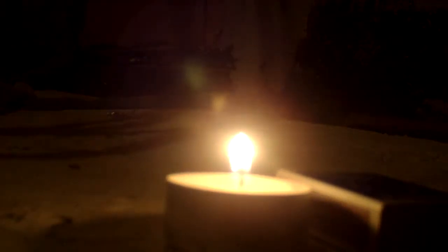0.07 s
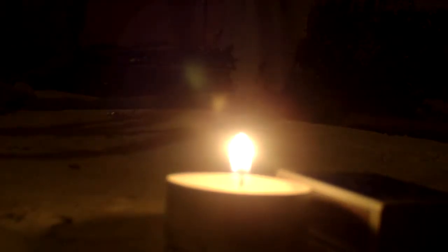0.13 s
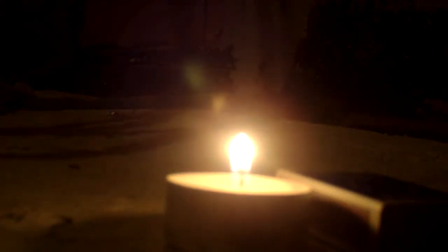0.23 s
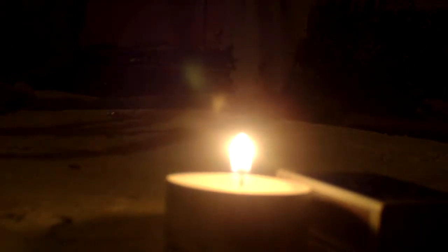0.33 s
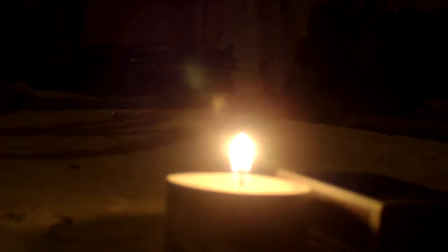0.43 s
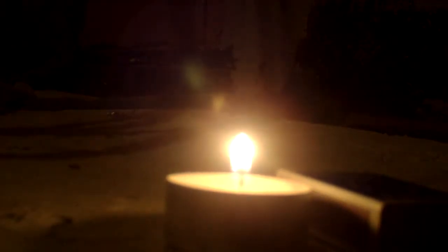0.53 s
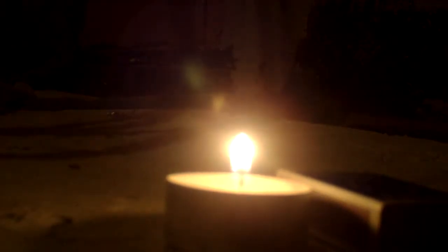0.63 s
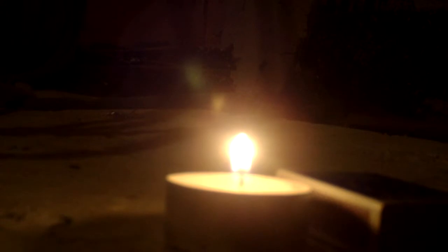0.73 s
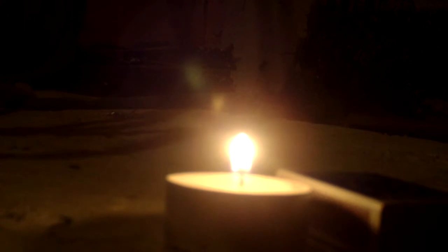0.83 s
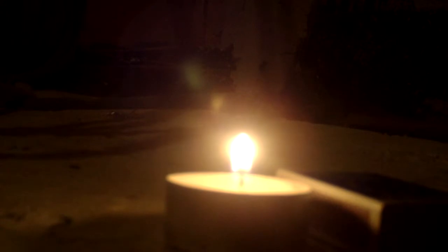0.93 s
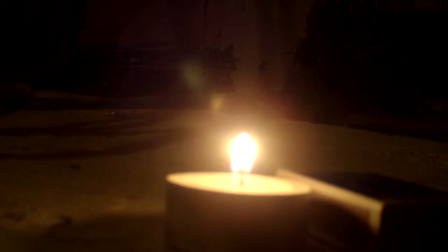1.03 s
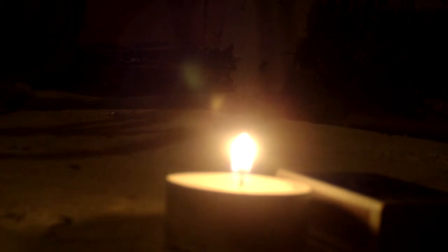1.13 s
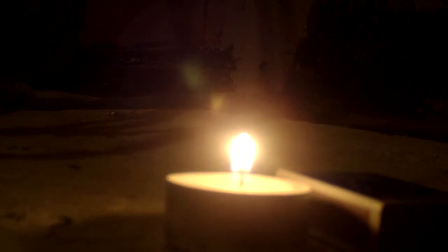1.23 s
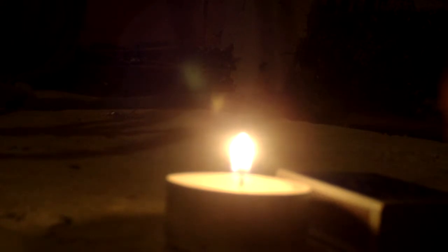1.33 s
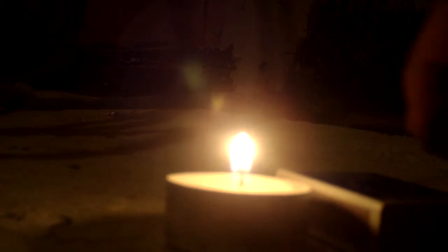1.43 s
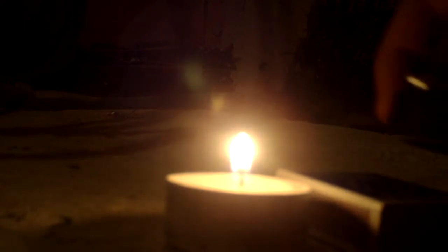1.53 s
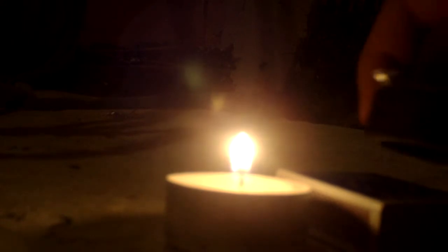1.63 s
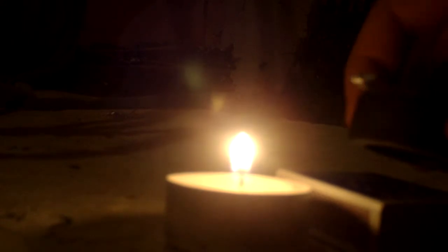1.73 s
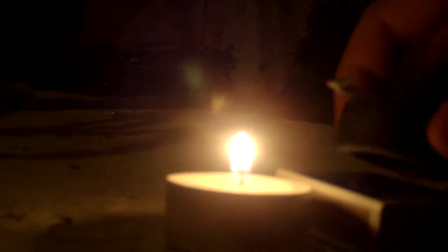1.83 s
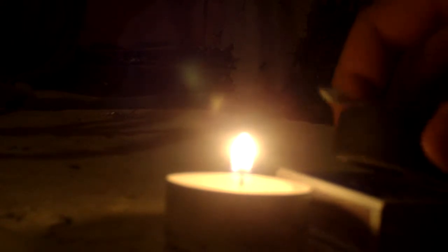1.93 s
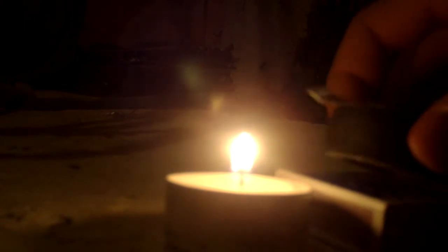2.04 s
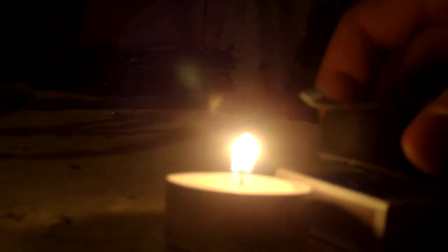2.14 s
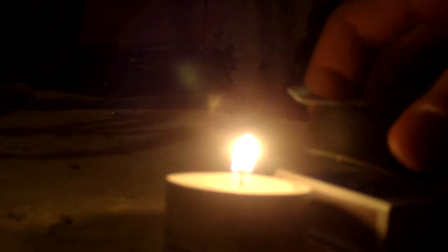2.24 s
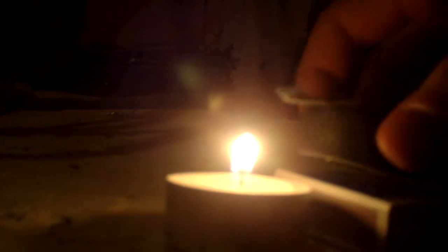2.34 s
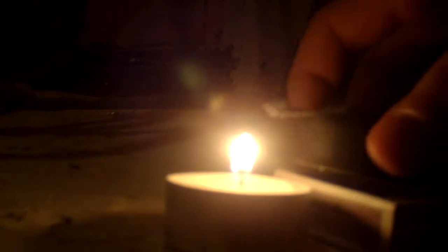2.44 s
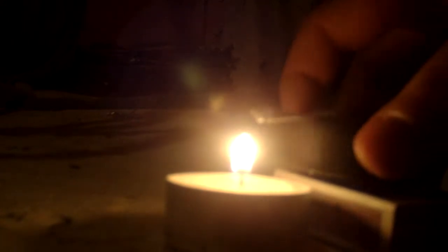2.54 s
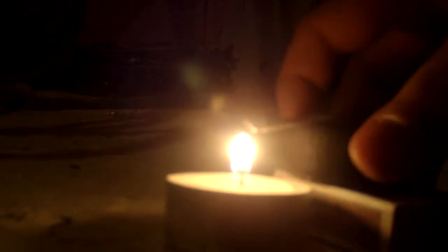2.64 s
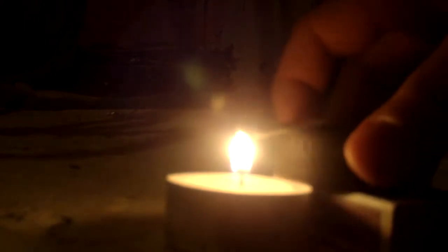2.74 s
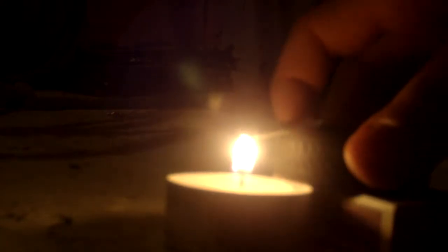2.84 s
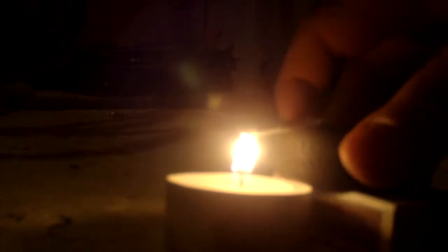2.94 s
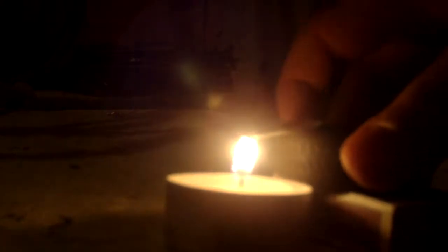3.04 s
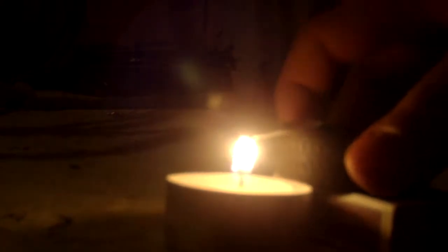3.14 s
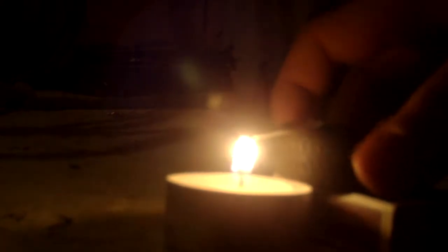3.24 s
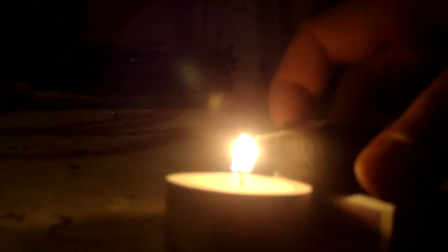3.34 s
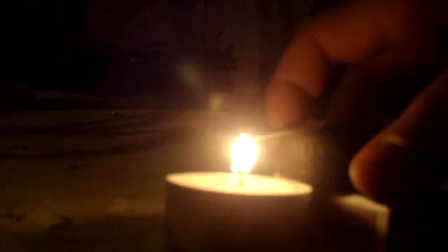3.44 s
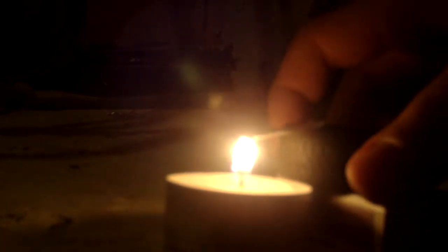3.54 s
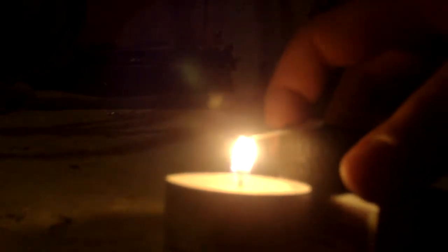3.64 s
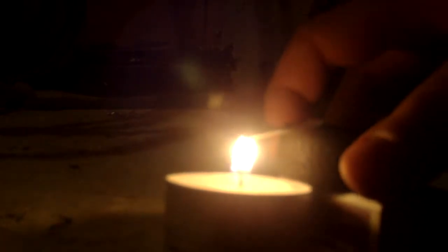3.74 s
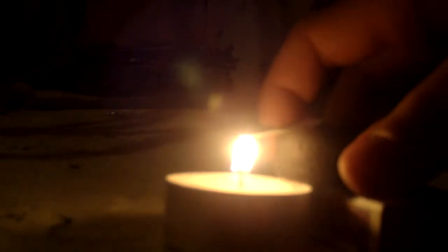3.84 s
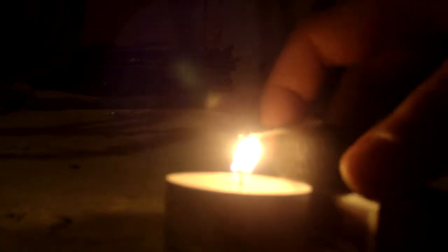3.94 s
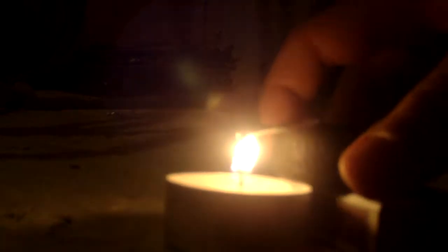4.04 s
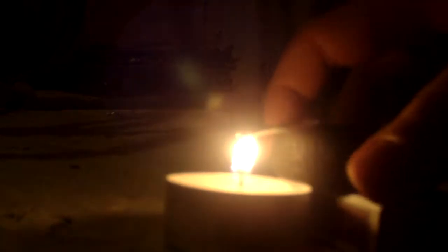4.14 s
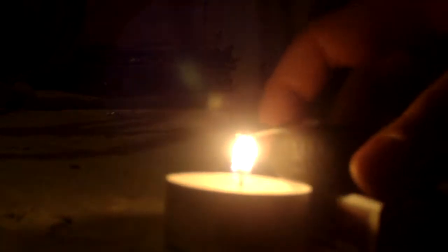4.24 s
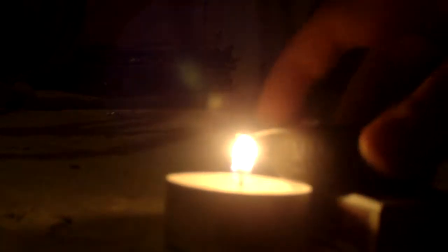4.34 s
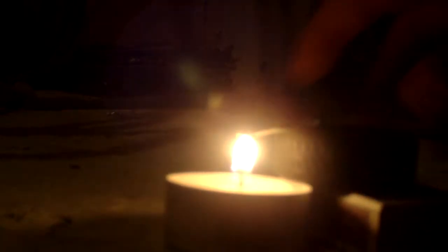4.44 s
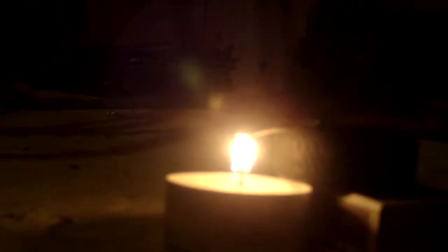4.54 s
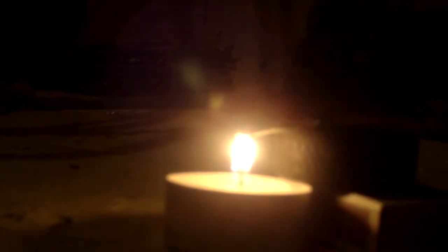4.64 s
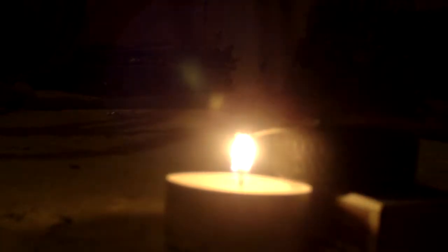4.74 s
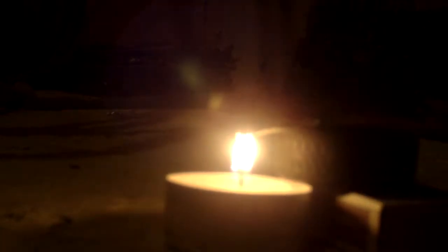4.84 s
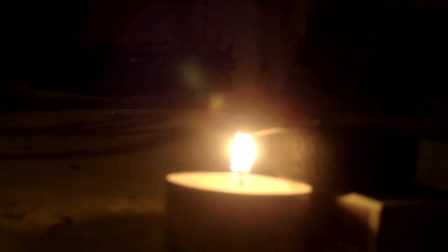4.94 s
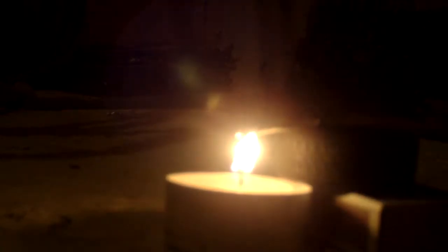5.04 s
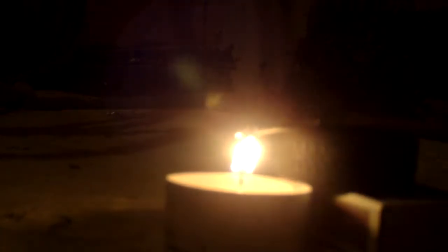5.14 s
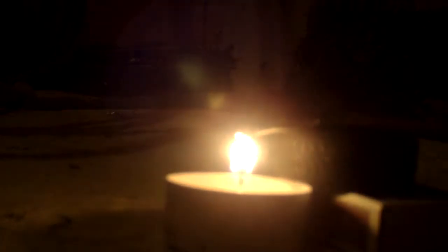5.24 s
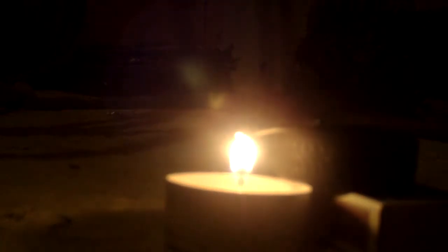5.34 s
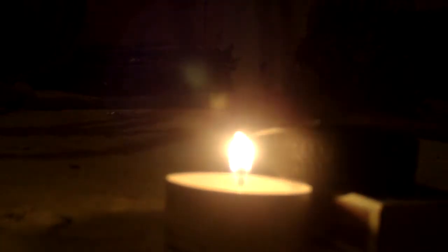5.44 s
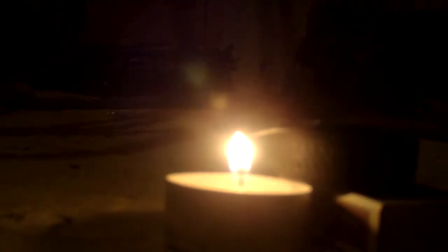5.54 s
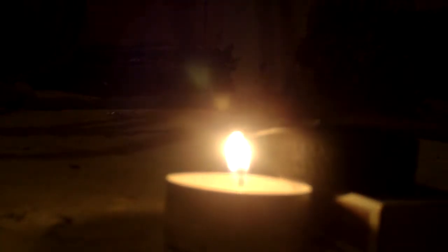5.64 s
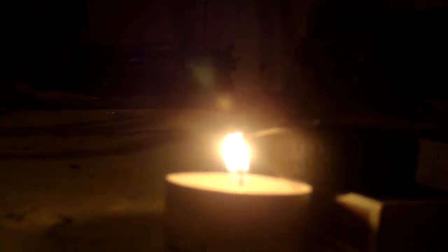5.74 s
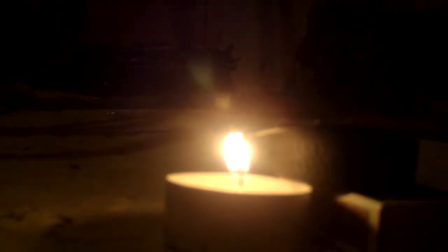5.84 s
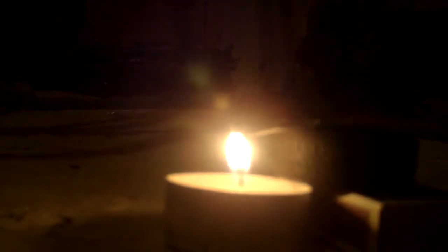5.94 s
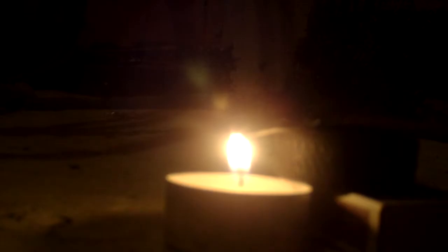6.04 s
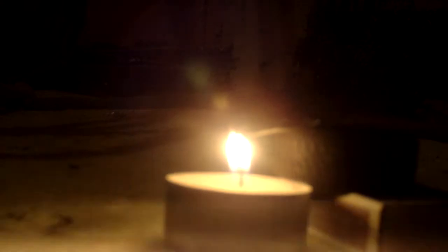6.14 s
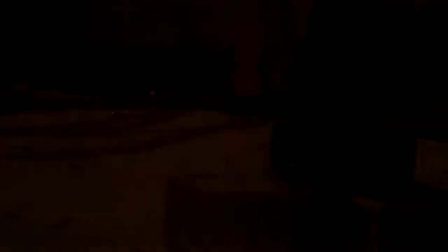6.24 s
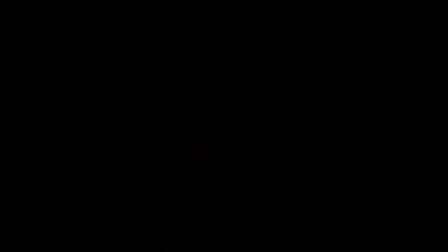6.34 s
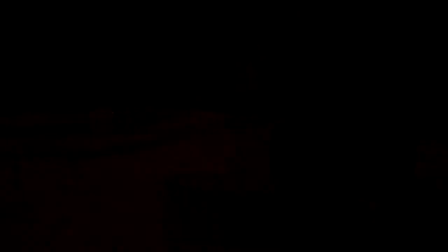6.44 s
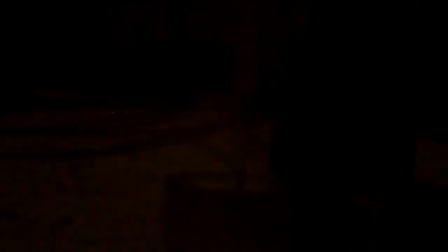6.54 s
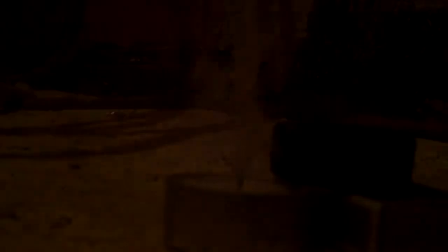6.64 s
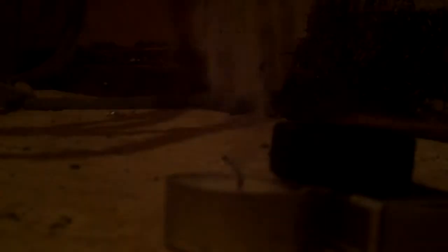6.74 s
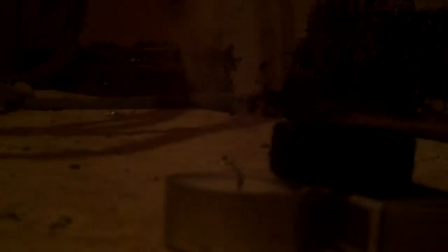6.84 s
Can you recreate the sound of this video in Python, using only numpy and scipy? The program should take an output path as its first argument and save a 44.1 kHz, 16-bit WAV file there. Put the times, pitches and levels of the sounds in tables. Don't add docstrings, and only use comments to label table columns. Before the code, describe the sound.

Close to a small microphone in a quiet, hard-walled room, fingers tick and rustle faintly on paper, foil and a matchbox over soft hiss and low rumble. Around five seconds the handling grows firmer, with scrapes and hollow box knocks. Then a tiny firecracker at a candle bangs enormously loud, overloading the microphone, with a short room tail and fine crumbs ticking down.

```python
import sys
import numpy as np
from scipy import signal
from scipy.fft import rfft, irfft
from scipy.io import wavfile
from scipy.ndimage import uniform_filter1d

SR = 44100
rng = np.random.default_rng(int(sys.argv[2]) if len(sys.argv) > 2 else 0)


def dump(signal):
    limited = np.clip(np.atleast_2d(signal).T, -1, 1)
    pcm = np.round(limited * 32767).astype(np.int16)
    wavfile.write(sys.argv[1], SR, pcm)


def rack_gain(trim_db):
    fader = np.asarray(trim_db, float)
    return 10 ** (fader / 20)


N = 303400

# (frequency [Hz], density [dB per Hz])
BLAST_SPECTRUM = [(60, -35), (170, -5), (470, -1), (800, -2.5), (1400, -3), (2100, -12.5), (3900, 0),
                  (5200, -1), (6400, 3), (8400, -5), (11400, -3), (15400, -12.5)]
# (frequency [Hz], 60 dB decay time [s])
WALL_DECAY = [(100, 0.093), (300, 0.21), (800, 0.16), (2000, 0.23), (5000, 0.21), (12000, 0.15)]
BANG_S, BANG_DB = 6.4058, 1.5

# (frequency [Hz], width [Hz], level [dB])
CARD_MODES = [(929, 920, 1.5), (1780, 590, 6), (2550, 1190, 1.5)]
# (frequency [Hz], width [Hz], level [dB])
SCRAPE_MODES = [(2900, 4100, 7), (4700, 3300, 12)]
# (frequency [Hz], width [Hz], level [dB])
PORT_MODES = [(6600, 3700, -9.5)]
# (frequency [Hz], width [Hz], level [dB])
FIZZ_MODES = [(9030, 1400, 0.5), (10600, 2500, 3), (15050, 7600, -4)]
# (time [s], frequency [Hz])
GRAIN_PITCH = [(0.2, 7000), (0.72, 7300), (0.92, 6160), (2.4, 7180), (2.7, 8350), (3.29, 6800),
               (4.52, 7600), (4.68, 6770), (5.71, 6230), (5.82, 6540), (6.88, 6840)]
# (start [s], rise [s], fall [s], level [dB])
SKIN_STROKES = [(.239, .013, .016, -53.5), (.301, .01, 0.052, -50.5), (.382, 0.017, .017, -62),
                (.692, .01, .018, -65), (.746, .017, .016, -58), (.785, .016, .014, -62),
                (1.024, 0.0075, .0084, -48), (1.053, .015, .014, -45), (1.15, 0.011, 0.021, -52),
                (1.187, .021, .024, -48.5), (1.219, 0.027, 0.025, -45.5), (1.275, 0.012, .021, -49.5),
                (2.214, .02, .046, -55), (2.278, 0.012, .044, -65), (2.576, 0.014, .0098, -45.5),
                (3.653, 0.039, 0.05, -51), (3.795, 0.026, 0.054, -50), (4.346, .019, .012, -63),
                (4.369, .013, .018, -60), (4.55, .018, 0.013, -51.5), (4.629, .011, 0.02, -62),
                (5.053, 0.0077, .016, -47.5), (5.076, 0.032, .017, -45), (5.105, .013, .045, -47),
                (5.153, 0.013, 0.01, -28.5), (6.062, .057, 0.036, -49.5), (6.246, 0.013, 0.03, -51)]
# (start [s], rise [s], fall [s], level [dB])
CLOTH_STROKES = [(.723, .015, .014, -63), (1.324, 0.049, 0.017, -43), (2.319, .024, .035, -61),
                 (2.371, .052, .064, -53), (2.486, 0.027, 0.014, -50), (2.529, 0.026, 0.018, -55),
                 (2.6, 0.033, .016, -48.5), (2.637, 0.0071, 0.042, -47), (2.684, .02, 0.078, -51),
                 (2.753, 0.013, 0.042, -55), (3.295, .021, .012, -60), (3.937, .015, .02, -69),
                 (4.126, 0.036, .015, -56.5), (4.432, .018, .018, -62.5), (4.658, 0.016, 0.074, -66),
                 (5.012, .027, .024, -48)]
# (start [s], rise [s], fall [s], level [dB])
DRAG_STROKES = [(.446, 0.016, .013, -66), (2.171, 0.0042, 0.011, -61.5), (2.867, 0.037, 0.012, -58.5),
                (2.935, 0.029, 0.02, -57), (2.986, 0.017, 0.013, -57), (3.092, 0.028, .05, -57),
                (3.202, .012, 0.017, -62), (3.343, 0.035, 0.014, -63.5), (3.551, .027, 0.021, -64),
                (3.993, 0.0081, .01, -59), (4.012, .021, .027, -63), (4.098, 0.0091, 0.0046, -57),
                (4.196, .016, 0.016, -64), (4.862, .095, 0.11, -51), (5.18, .0065, 0.058, -55),
                (5.262, 0.029, 0.028, -58.5), (5.394, .022, 0.013, -53), (5.42, 0.076, 0.063, -49.5),
                (5.742, 0.018, 0.022, -69), (5.853, .014, .033, -57), (5.909, .012, 0.032, -54),
                (5.98, 0.017, 0.027, -51), (6.365, 0.023, 0.024, -61)]
# (start [s], rise [s], fall [s], level [dB])
SHOVE_STROKES = [
    (4.907, .069, 0.013, -41.5),
    (5.491, 0.02, 0.01, -40.5),
    (5.797, 0.018, 0.031, -58),
]
# (scrape share [dB], fizz share [dB])
MATERIAL_SHARES = [
    (-9.5, -7),
    (-10.5, -17),
    (-1.5, -8),
    (6, -7.5),
]
# (start [s], end [s], level [dB])
HAND_SHUFFLE = [
    (2.4, 4.6, -73.5),
    (4.795, 5.4, -64.5),
    (5.6, 6.4, -68.5),
]
SHUFFLE_SCRAPE_DB, SHUFFLE_FIZZ_DB = -6, -10.5
SHOWER_DELAY_S, SHOWER_RISE_S, SHOWER_DB, SHOWER_DB_PER_S = 0.09, 0.07, -42, -63
SHOWER_SCRAPE_DB, SHOWER_FIZZ_DB = -10.5, -4

# (start [s], rise [s], fall [s], level [dB], pitch
# [Hz])
CLEAR_NOTES = [(2.93, .059, .05, -58, 1500), (2.95, .062, .025, -64, 4300), (3.07, .07, 0.12, -69, 1480),
               (3.297, .011, 0.016, -53, 4200), (3.995, 0.023, .04, -55, 4200),
               (5.5, .036, .075, -53, 1060), (5.498, .023, 0.055, -49.5, 765),
               (5.5, .031, 0.078, -54.5, 1296), (5.86, .0087, 0.046, -57, 1040),
               (6.118, .01, .022, -53, 590), (6.11, .016, 0.029, -52.5, 1015), (2.33, .059, .12, -68, 920),
               (2.58, .08, .16, -62, 890), (3.2, .02, .02, -65, 1550), (6.255, .01, .02, -58, 1060),
               (1.328, .012, .05, -47, 6900), (2.62, .05, .12, -58, 4800)]
# (start [s], rise [s], fall [s], level [dB], pitch
# [Hz])
MUFFLED_NOTES = [(.3, 0.017, 0.049, -56.5, 950), (1.02, 0.038, .033, -60, 1890),
                 (1.19, 0.077, 0.13, -60, 2060), (2.17, 0.0071, .0073, -57.5, 1910),
                 (3.1, .016, 0.0096, -55, 800), (4.869, 0.074, 0.018, -46, 1010),
                 (4.99, 0.071, 0.32, -51.5, 59), (5.0, 0.021, 0.29, -53.5, 1120),
                 (5.171, 0.0041, 0.0022, -31, 6300), (5.25, 0.034, 0.034, -58, 1010),
                 (5.43, 0.029, .075, -50, 1206), (5.853, 0.0035, 0.029, -40, 326),
                 (5.982, 0.011, 0.074, -51.5, 590), (6.251, 0.012, 0.024, -58, 590),
                 (5.8, 0.0025, 0.058, -43, 1970), (5.81, 0.011, 0.053, -44.5, 188),
                 (3.305, 0.0049, .015, -56.5, 1000), (4.734, 0.0012, 0.01, -47, 1200),
                 (4.0, 0.0089, .04, -58, 750), (5.41, 0.0044, 0.018, -47, 600),
                 (5.745, .015, 0.023, -61.5, 1000), (5.865, 0.0104, 0.038, -55.5, 600),
                 (5.985, .006, .04, -52, 230), (5.505, .006, .015, -48, 170)]
CLEAR_WIDTH, MUFFLED_WIDTH = 0.097, 0.49

# (time [s], peak [dB], centre [Hz])
NAIL_SNAPS = [(.3894, -33.5, 7640), (.727, -45, 7500), (.7361, -36, 8500), (1.2013, -34, 7560),
              (1.2313, -33, 7100), (2.2527, -27, 7700), (2.5073, -34, 7800), (2.569, -39, 9600),
              (2.5857, -24.5, 7350), (2.591, -32, 6900), (2.6025, -34, 6860), (2.6587, -31, 8600),
              (2.9557, -31, 7800), (3.0015, -37, 4270), (3.135, -43, 8000), (3.6253, -36, 7000),
              (3.95, -38, 6700), (3.957, -38, 6600), (3.9869, -43, 8300), (4.064, -38.5, 4470),
              (4.52, -43, 6300), (4.6151, -39.5, 5740), (4.6755, -44, 6200), (4.7143, -42, 6400),
              (4.8945, -25, 6460), (5.0838, -26.5, 7000), (5.6519, -45, 7000), (5.6684, -43, 7900),
              (5.6828, -36.5, 6850)]
# (time [s], peak [dB], centre [Hz])
EDGE_TAPS = [(.2488, -34, 6500), (.6985, -44, 6770), (1.0264, -32, 6840), (1.163, -33, 6250),
             (1.267, -37, 7100), (2.1776, -42, 6600), (3.1109, -34, 4470), (3.309, -38, 4300),
             (4.103, -39, 7100), (4.1467, -41, 7200), (4.734, -27.5, 6150), (4.74, -48, 10000),
             (5.018, -28, 6900), (5.113, -30.5, 7270), (5.5059, -24, 4700), (5.587, -42, 3480),
             (5.7234, -37.5, 6500)]
# (time [s], peak [dB], centre [Hz])
CRUMB_LANDINGS = [(6.554, -40, 10500), (6.5958, -37.5, 7500), (6.6196, -25, 6740), (6.6334, -25, 7350),
                  (6.6724, -27, 7460), (6.7426, -29, 9100), (6.748, -48, 7000), (6.7713, -41, 6670),
                  (6.791, -36, 11240), (6.8211, -37.5, 7540), (6.8342, -42.5, 7000), (6.8633, -35, 7500)]
SNAP_CARD_DB, TAP_CARD_DB, CRUMB_CARD_DB = -18.5, -6, -21.5

# (time [s], peak [dB], low push [dB], contact [s])
BOX_KNOCKS = [
    (5.412, -36, -30, .004),
    (5.512, -30, -50, .003),
    (5.856, -42, -34, .004),
    (5.984, -38, -42, .004),
    (6.855, -49, -52, .004),
    (5.7988, -22, -40, .0025),
    (5.8035, -28, -50, .004),
    (5.8125, -31, -45, .004),
]
# (frequency [Hz], width [Hz], level [dB])
BOX_MODES = [(190, 60, -17), (385, 60, -17), (760, 220, -16), (950, 40, -11), (1055, 20, 2),
             (1180, 60, -11), (1440, 60, -14), (1840, 250, -22), (2800, 900, -31)]
# (frequency [Hz], width [Hz], level [dB])
TRAY_MODES = [(1480, 120, 0), (2270, 160, -9), (4300, 500, -8.5), (7000, 570, -8), (11000, 1100, -19.5),
              (850, 220, -12)]
# (time [s], peak [dB])
TRAY_CATCHES = [
    (4.0018, -37.5),
    (4.014, -40),
    (4.025, -35.5),
    (4.032, -42),
    (4.0452, -39),
    (4.053, -44),
    (4.106, -45),
    (4.149, -43),
    (4.275, -49),
    (4.215, -51),
]
CATCH_S = 0.0025

MOTOR_ON_S, MOTOR_OFF_S, MOTOR_FADE_S, MOTOR_DB = 2.5, 5.9, 0.04, -68.4
MOTOR_FREE_HZ, MOTOR_LOADED_HZ, MOTOR_SAG_S = 436, 368, 0.31

# (frequency [Hz], density [dB per Hz])
HISS_SPECTRUM = [(71, -55), (120, -6), (184, -14.5), (276, -9), (440, -12), (661, -16), (762, -16.5),
                 (897, -17.5), (973, -19.5), (6310, -27), (15400, -27.5)]
# (frequency [Hz], density [dB per Hz])
RUMBLE_SPECTRUM = [(4.7, -41.5), (8.0, 2.5), (21, -2.5), (38, -0.5), (182, -16.5), (218, -21), (246, -18.5),
                   (300, -27), (390, -50.5), (660, -120)]
HISS_DB, RUMBLE_DB, RUMBLE_GROWTH_DB_PER_S, SWAY_DB = -62, -52.5, 0.4, 0.6
EDGE_HZ, CEILING = 16400, 1.05


def bang():
    out, t = np.zeros(N), np.arange(24000) / SR
    u = t / 0.000069
    shock = -(1 - u) * np.exp(-u)
    walls = coloured(room(24000, start=8.9), BLAST_SPECTRUM) * (1 - np.exp(-t / 0.00026))
    walls /= np.sqrt(np.mean(walls[:900] ** 2))
    venting = 1 + 0.71 * np.exp(-(t / 0.048) ** 4)
    lean = -1.9 * (1 - np.exp(-t / 0.0002)) * np.exp(-(t / 0.017) ** 2)
    add(out, BANG_S, rack_gain(BANG_DB) * (venting * walls + 6.7 * shock) + lean)
    return out


def rubbing():
    power, drive = np.zeros((4, N)), slips(count=5)
    materials = (SKIN_STROKES, CLOTH_STROKES, DRAG_STROKES, SHOVE_STROKES)
    for strokes, material in zip(materials, MATERIAL_SHARES):
        split = shares(*material)[:, None]
        for s, rise, fall, db in strokes:
            add(power, s - rise / 3, rack_gain(db) ** 2 * split * stroke(rise, fall))

    for start, end, db in HAND_SHUFFLE:
        level = rack_gain(db) ** 2 * signal.windows.tukey(round((end - start) * SR), 0.3)
        add(power, start, level * shares(SHUFFLE_SCRAPE_DB, SHUFFLE_FIZZ_DB)[:, None])

    t = np.arange(SR) / SR
    shower = np.minimum(t / SHOWER_RISE_S, 1) * rack_gain(SHOWER_DB + SHOWER_DB_PER_S * (t - SHOWER_RISE_S))
    dust = shower ** 2 * shares(SHOWER_SCRAPE_DB, SHOWER_FIZZ_DB)[:, None]
    add(power, BANG_S + SHOWER_DELAY_S, dust)

    card = ring(ring(drive[0], CARD_MODES), CARD_MODES)
    scrape = ring(ring(drive[1], SCRAPE_MODES), SCRAPE_MODES)
    fizz = ring(ring(drive[2], FIZZ_MODES), FIZZ_MODES)
    pitch = np.interp(np.arange(N) / SR, *np.transpose(GRAIN_PITCH))
    grain = evened(sing(drive[3], pitch, 2770)) + ring(drive[4], PORT_MODES)
    bands = (card, scrape, grain, fizz)
    return sum(np.sqrt(p) * evened(band) for p, band in zip(power, bands))


def sliding():
    out, drive = np.zeros(N), slips(count=1)[0]
    for rows, width in ((CLEAR_NOTES, CLEAR_WIDTH), (MUFFLED_NOTES, MUFFLED_WIDTH)):
        for s, rise, fall, db, hz in rows:
            power = stroke(rise, fall)
            rub = drive[round(s * SR):][:len(power)]
            note = sing(rub, np.full(len(power), hz), 2.14 * width * hz)
            add(out, s - rise / 3, rack_gain(db) * np.sqrt(power) * evened(note))
    return out


def ticks():
    out, t = np.zeros(N), np.arange(900) / SR
    groups = ((NAIL_SNAPS, SNAP_CARD_DB), (EDGE_TAPS, TAP_CARD_DB), (CRUMB_LANDINGS, CRUMB_CARD_DB))
    for rows, card_db in groups:
        for s, db, hz in rows:
            rattle = 0.18 * rng.standard_normal(900) * rack_gain(-60 * t / 0.0061)
            snap = 1.0 * (t == 0) + rattle
            bright = ring(snap, [(hz, 1300, 0), (12800, 4000, -15)])
            card = ring(snap, CARD_MODES)
            add(out, s, rack_gain(db) * (bright / abs(bright).max() + rack_gain(card_db) * card / abs(card).max()))
    return out


def knocks():
    out, t = np.zeros(N), np.arange(6000) / SR
    u = t / 0.0019
    push = u * np.exp(1 - u) * np.cos(2 * np.pi * 110 * t)
    for s, db, push_db, contact in BOX_KNOCKS:
        blow = 24 * (t == 0) + rng.standard_normal(6000) * np.exp(-t / contact)
        box = ring(blow, BOX_MODES)
        add(out, s, rack_gain(db) * box / abs(box).max() + rack_gain(push_db) * push)
    return out


def judder():
    out, t = np.zeros(N), np.arange(2500) / SR
    for s, db in TRAY_CATCHES:
        chatter = rng.standard_normal(len(t)) * np.exp(-t / CATCH_S)
        tray = ring(3 * (t == 0) + chatter, TRAY_MODES)
        add(out, s, rack_gain(db) * tray / abs(tray).max())
    return out


def whine():
    t = np.arange(N) / SR
    running = np.clip(np.minimum(t - MOTOR_ON_S, MOTOR_OFF_S - t) / MOTOR_FADE_S, 0, 1)
    sag = np.exp(-abs(t - MOTOR_ON_S) / MOTOR_SAG_S)
    hz = MOTOR_LOADED_HZ + (MOTOR_FREE_HZ - MOTOR_LOADED_HZ) * sag
    waver = wander(3000)
    return 1.4 * running * rack_gain(MOTOR_DB + 2.6 * waver) * np.sin(2 * np.pi * np.cumsum(hz) / SR)


def floor():
    hiss = rack_gain(HISS_DB) * evened(coloured(rng.standard_normal(N), HISS_SPECTRUM))
    rumble = evened(coloured(rng.standard_normal(N), RUMBLE_SPECTRUM))
    growth_db = RUMBLE_GROWTH_DB_PER_S * np.arange(N) / SR
    return hiss + rack_gain(RUMBLE_DB + growth_db + SWAY_DB * wander(15000)) * rumble


def room(length, start):
    hz, t, z = signal.stft(rng.standard_normal(length), SR, nperseg=256)
    decay = rack_gain(-60 * t / read(WALL_DECAY, hz)[:, None])
    tail = signal.istft(z * decay, SR, nperseg=256)[1][:length]
    tail = tail * (np.arange(length) >= start)
    return tail / np.linalg.norm(tail)


def slips(count):
    size = rack_gain(1.7 * np.minimum(rng.exponential(1, N), 3)) * (rng.random(N) < 7000 / SR)
    grip = rack_gain(3.0 * evened(uniform_filter1d(rng.standard_normal(N), 110)))
    return grip * np.sqrt(evened(size) ** 2 + 0.7) * rng.standard_normal((count, N))


def stroke(rise, fall):
    swell = np.linspace(4 / 3, 0, max(round(4 / 3 * rise * SR), 9)) ** 1.9
    release = np.linspace(0, 4 / 3, max(round(4 / 3 * fall * SR), 9)) ** 2.0
    return np.exp(-2.8 * np.r_[swell, release])


def shares(scrape_db, fizz_db):
    return rack_gain([scrape_db - 0.5, scrape_db, 0, fizz_db]) ** 2


def ring(x, modes):
    out = np.zeros(len(x))
    for k, (hz, width, db) in enumerate(modes):
        out += (-1) ** k * rack_gain(db) * signal.lfilter(*signal.iirpeak(hz, hz / width, SR), x)
    return out


def sing(x, hz, width):
    turn = np.exp(2j * np.pi * np.cumsum(hz) / SR)
    r = np.exp(-np.pi * width / SR)
    smooth = signal.lfilter([(1 - r) ** 2], [1, -2 * r, r * r], x / turn)
    return 2 * (turn * smooth).real


def coloured(x, points):
    return irfft(rfft(x) * rack_gain(read(points, np.fft.rfftfreq(len(x), 1 / SR))), len(x))


def wander(size):
    return evened(uniform_filter1d(uniform_filter1d(rng.standard_normal(N), size), size))


def evened(x):
    return x / np.sqrt(np.mean(x ** 2) + 1e-20)


def read(points, hz):
    f, value = np.transpose(points)
    return np.interp(np.log(hz + 1), np.log(f + 1), value)


def add(mix, s, sound):
    part = mix[..., round(s * SR):][..., :sound.shape[-1]]
    part += sound[..., :part.shape[-1]]


def scene():
    near = rubbing() + sliding() + ticks() + knocks() + judder()
    wet = rack_gain(-17.0) * signal.fftconvolve(near, room(12000, start=60))[:N]
    return (near + wet + bang() + whine() + floor())[None]


def low_pass(x):
    return signal.sosfilt(signal.butter(12, 15570, fs=SR, output="sos"), x)


def record(dry):
    full = 1.6 * np.tanh(dry / 1.508)
    coupled = signal.lfilter(*signal.butter(1, 1.45, "high", fs=SR), full)
    edge = signal.firwin(255, EDGE_HZ, window=("kaiser", 8), fs=SR)[None]
    limited = signal.oaconvolve(coupled, edge, "same")
    return low_pass(np.clip(limited, -CEILING, CEILING))


dry = scene()
out = record(dry)
dump(out)
```